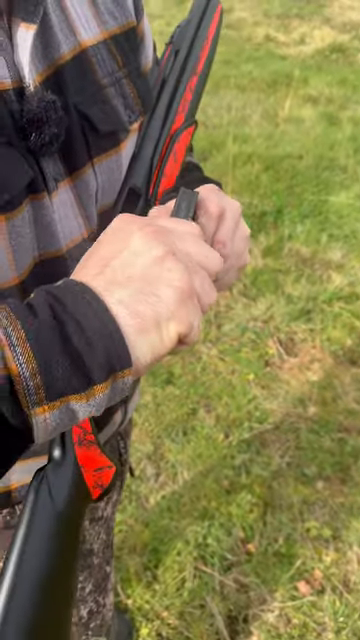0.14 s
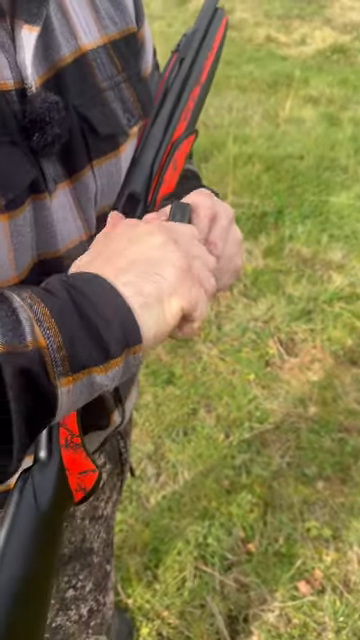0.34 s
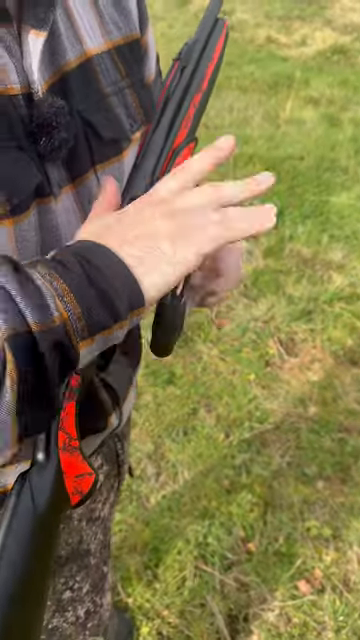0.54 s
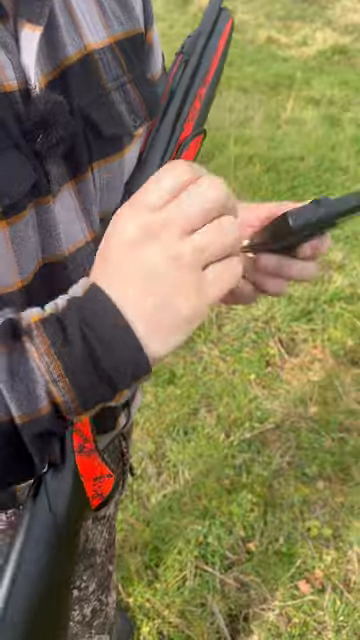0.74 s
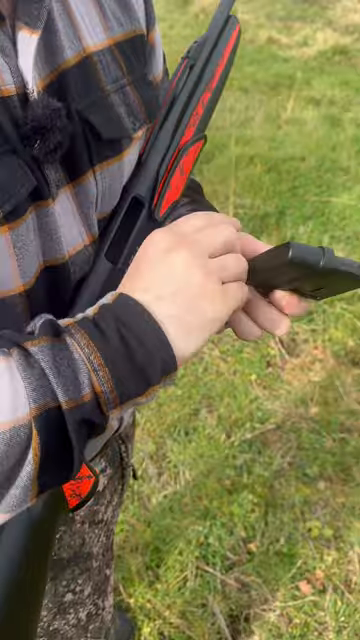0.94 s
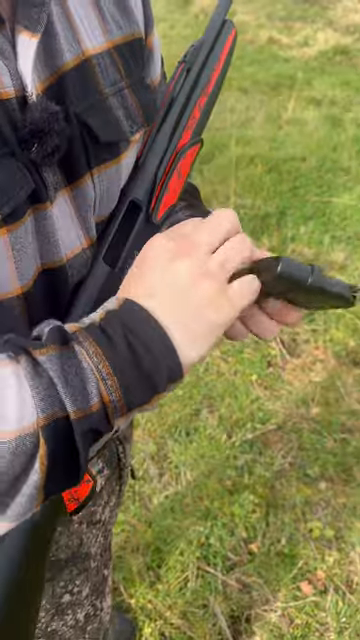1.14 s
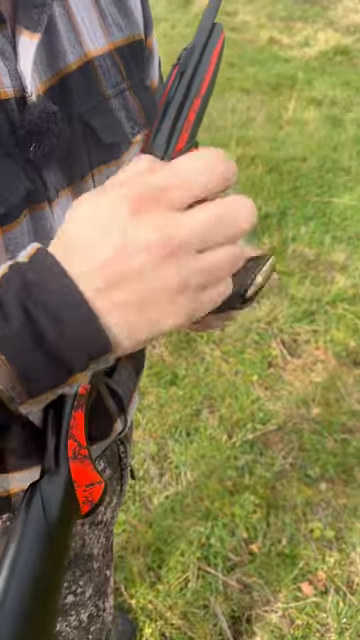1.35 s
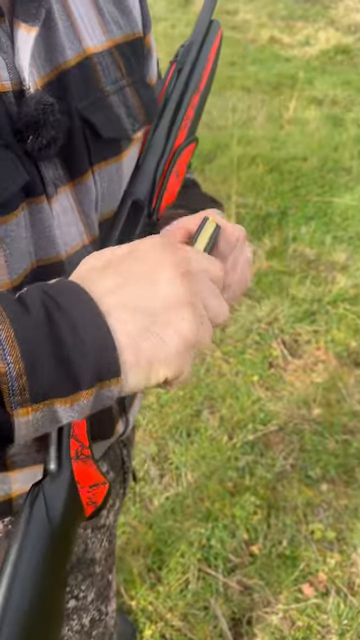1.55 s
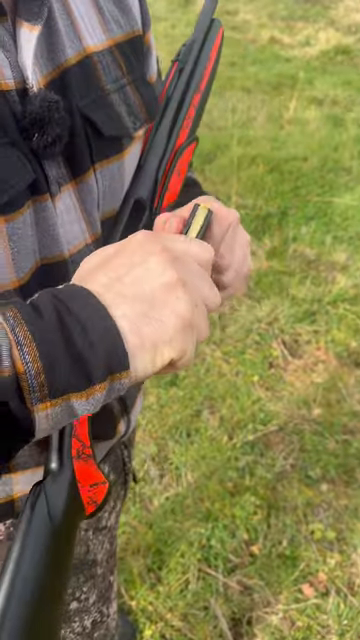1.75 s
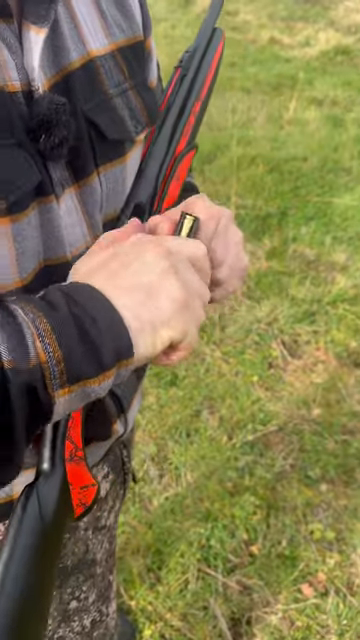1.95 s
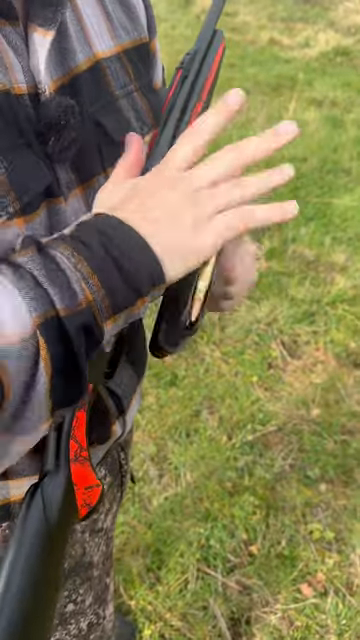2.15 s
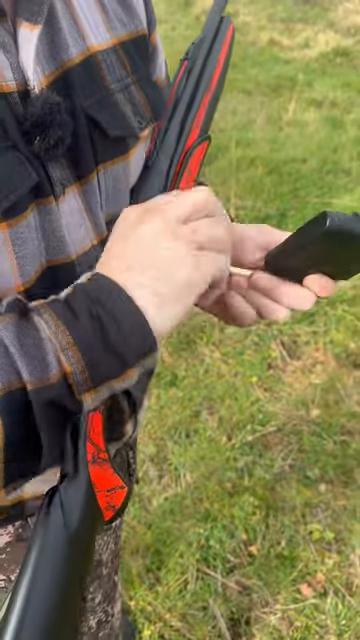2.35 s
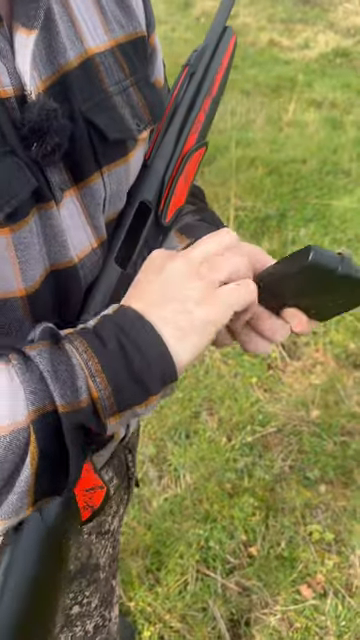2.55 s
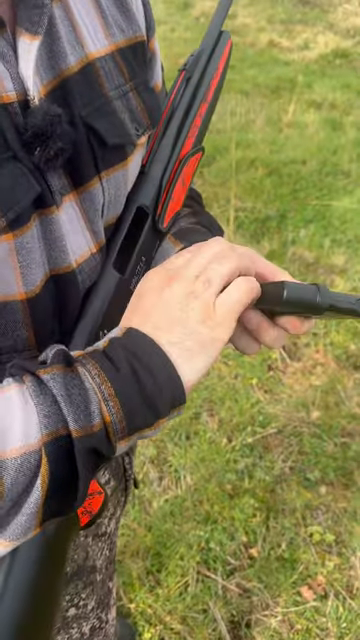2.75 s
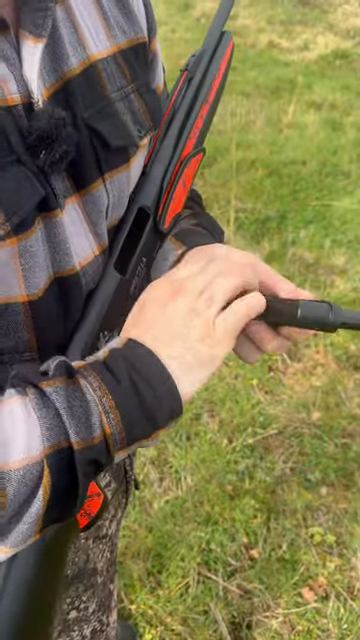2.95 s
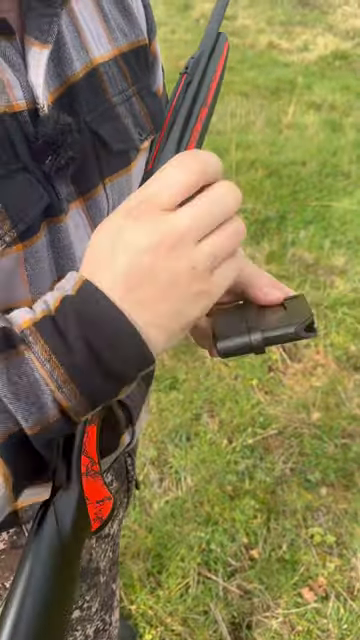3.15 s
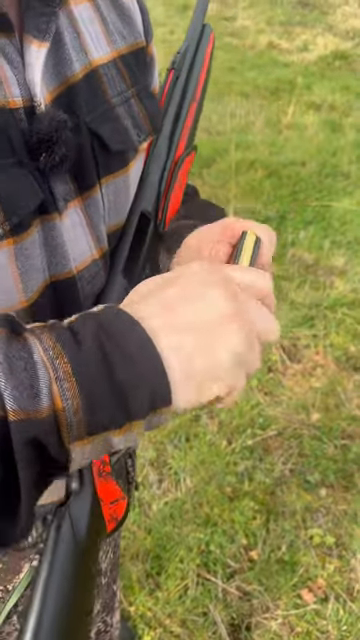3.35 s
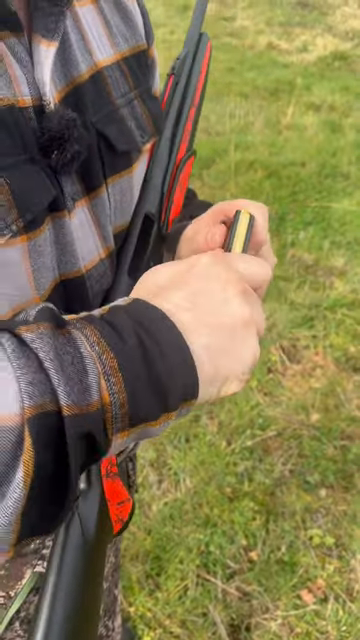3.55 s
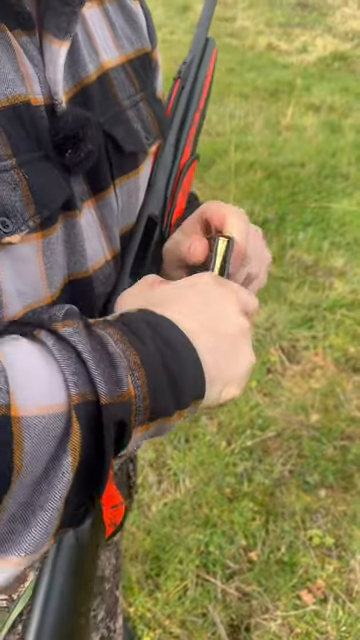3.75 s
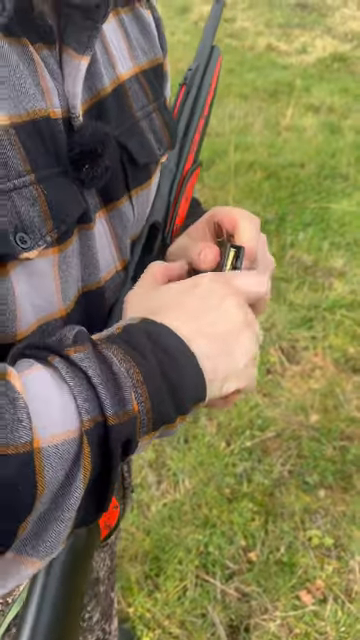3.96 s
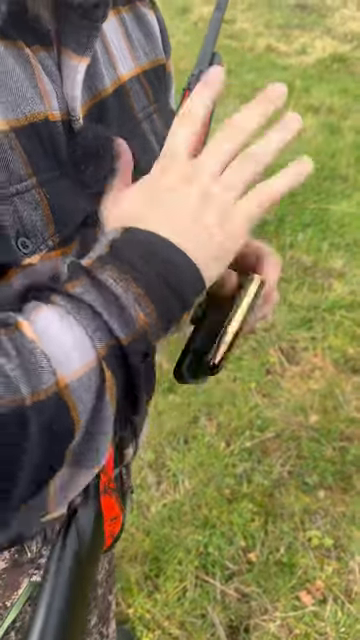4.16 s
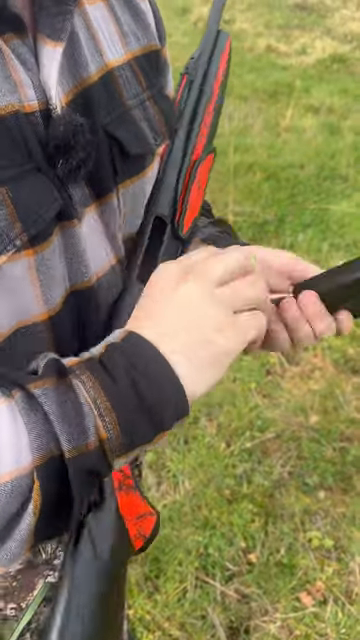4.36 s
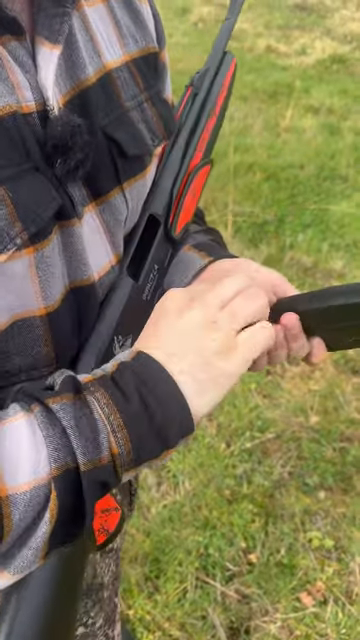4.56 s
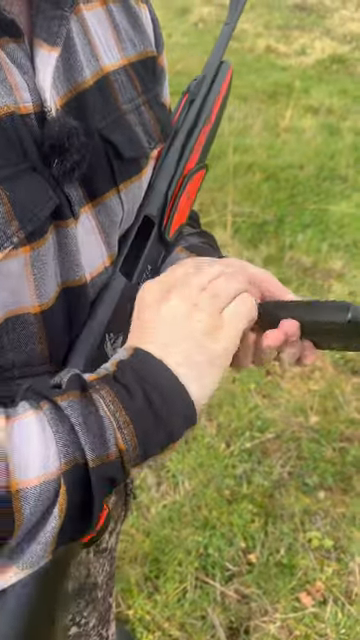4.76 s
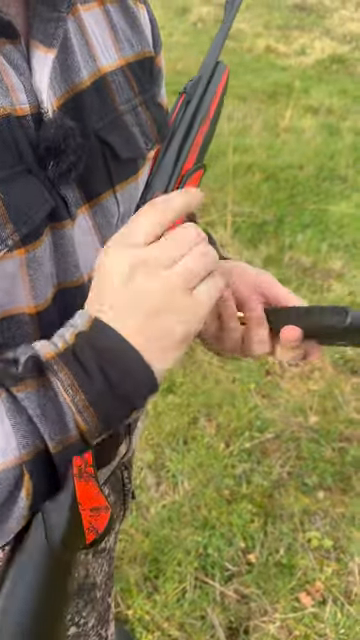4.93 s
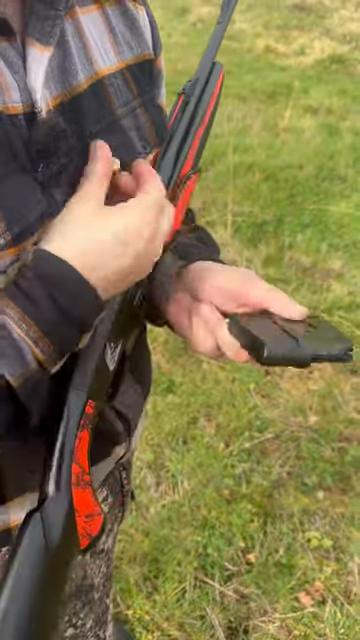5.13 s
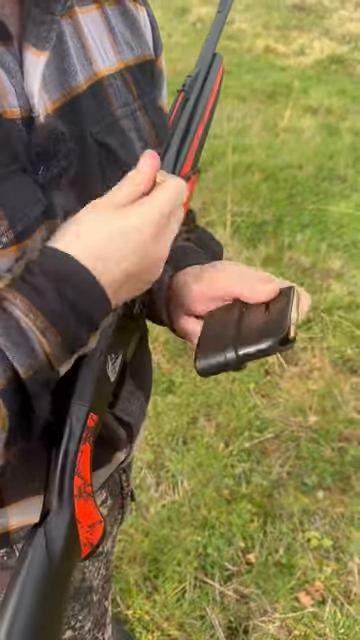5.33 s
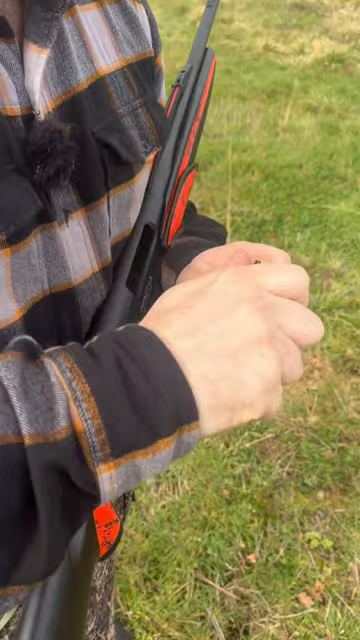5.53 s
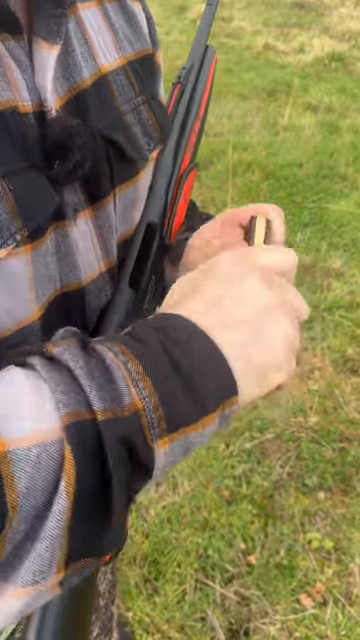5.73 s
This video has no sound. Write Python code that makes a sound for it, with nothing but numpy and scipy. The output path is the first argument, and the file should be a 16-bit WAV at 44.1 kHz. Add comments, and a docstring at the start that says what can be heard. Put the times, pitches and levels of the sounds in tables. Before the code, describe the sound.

Very close, dry handling of brass cartridges and a hollow plastic magazine. Light ticks and gritty rubs lead to sharp snaps as rounds seat, at about 0.4, 2, 3.3 and 4 seconds. A burst of wind puffs thumps the microphone after 4.3, then thin bright brass ticks near 4.9 and softer knocks to the end. Open grass field, faint hiss, no echo, small stereo microphone.

```python
"""Brass cartridges are handled and pressed into a plastic rifle magazine, close to a pair of microphone ports.
Each contact is a short chatter of micro-impacts that rings the hollow box, its walls and the brass cases.
In between, fingers and cases rub in short strokes: grit noise filtered by the same three bodies.
Wind over the ports is lumpy low noise with falling puffs; far off, a faint low tone throbs.
Behind it all lies the quiet hiss of the meadow."""
import sys
import numpy as np
from scipy import signal
from scipy.fft import rfft, irfft
from scipy.io import wavfile
from scipy.ndimage import uniform_filter1d

SR = 44100
rng = np.random.default_rng(int(sys.argv[2]) if len(sys.argv) > 2 else 0)


def log_audio(samples):
    """Write samples as a 16-bit WAV file to the path given in sys.argv[1]."""
    # one column per channel
    frames = np.atleast_2d(samples).T
    # limit to full scale, then quantise
    limited = np.clip(frames, -1, 1)
    pcm = np.round(limited * 32767).astype(np.int16)
    wavfile.write(sys.argv[1], SR, pcm)


N = 259749  # samples in the scene

# Meadow hiss, relative spectrum: f/Hz, level/dB
AIR_SPECTRUM = [(100, -9), (250, -0.5), (500, 2), (900, -6), (1500, -13), (2500, -30), (5000, -26.5),
                (8000, -30), (12500, -28.5), (14000, -31.5), (15500, -44.5)]
AIR_DB = -68.5

# Far throb, swells: centre t/s, level/dB
THROB_SWELLS = [(1.597, -60.5), (2.049, -60), (2.472, -60.5), (2.918, -60.5), (3.359, -57), (3.79, -59),
                (4.676, -61.5), (5.139, -67)]
THROB_HZ, THROB_S = 136.4, 0.14

# Wind at the ports over time: t/s, rumble level/dB, roar level/dB
WIND_LEVELS = [(0.0, -42, -70), (0.38, -56.5, -67.5), (1.21, -52.5, -69), (1.43, -48, -62.5),
               (1.47, -57, -68.5), (1.76, -49.5, -68), (2.43, -59.5, -65), (2.46, -45, -67),
               (2.54, -61, -67.5), (2.95, -53, -65), (3.33, -56, -66.5), (3.61, -47.5, -71),
               (4.1, -54.5, -60.5), (4.36, -43, -62), (4.56, -49, -71), (4.59, -64.5, -61),
               (4.67, -49, -69), (4.71, -57, -66), (4.89, -60.5, -71), (4.92, -42.5, -60),
               (5.02, -67.5, -71), (5.3, -59.5, -70), (5.41, -71, -71.5), (5.68, -52.5, -64.5),
               (5.76, -42, -63), (5.89, -62, -69)]
# Low rumble of the wind, relative spectrum: f/Hz, level/dB
RUMBLE_SPECTRUM = [(20, -34.5), (35, -17), (50, -2), (64, 9), (80, -7), (110, -4), (160, -24.5),
                   (250, -63.5)]
# Higher roar of the wind, relative spectrum: f/Hz, level/dB
ROAR_SPECTRUM = [(60, -31), (110, -2), (150, 6), (220, -2), (320, -8), (500, -35)]
# Puffs on the ports: start t/s, peak level/dB, start f/Hz, end f/Hz, length/s
WIND_PUFFS = [(4.272, -39.5, 157, 98.4, 0.079), (4.311, -32.5, 380, 68.6, 0.021),
              (4.364, -32, 352, 57.8, 0.027), (4.423, -42, 301, 93, 0.013),
              (4.441, -35.5, 129.5, 50.6, 0.028), (4.469, -41.5, 172, 140.3, 0.052),
              (4.495, -36, 277.5, 70.6, 0.017), (4.528, -38, 132.7, 49, 0.02),
              (4.656, -46.5, 118.4, 45.5, 0.032), (4.914, -41.5, 239, 60, 0.0306),
              (5.615, -45.5, 185, 107, 0.021), (5.685, -41, 149, 90, 0.022), (5.714, -43, 216, 137, 0.036),
              (5.738, -33.5, 203, 45, 0.0094)]
GUST_DB, GUST_S = 1.5, .05  # depth of the slow rumble gusts, and their averaging span

# Hands shifting their grip: t/s, plastic level/dB, brass level/dB
GRIP_LEVELS = [(0.0, -84, -81), (0.39, -70.5, -74.5), (0.59, -84.5, -82.5), (1.06, -74, -76.5),
               (1.52, -89, -82.5), (1.92, -73.5, -79.5), (2.18, -78, -75.5), (2.38, -91, -89),
               (2.62, -86, -93.5), (3.07, -89.5, -82), (3.66, -80, -78.5), (4.13, -81, -74),
               (4.33, -85, -75), (4.56, -91, -83.5), (5.05, -75, -70), (5.61, -87.5, -80), (5.79, -79, -83),
               (5.89, -60.5, -72)]
GRIP_HOLLOW_DB = -1  # the hollow against the walls
# Strokes of fingers and cases: start t/s, length/s, hollow, walls and brass level/dB, swell to the end/dB
RUB_STROKES = [(0.069, 0.057, -81, -66.5, -78, 13.5), (0.124, 0.014, -53.5, -64, -52, -21),
               (.18, 0.049, -58.5, -62.5, -60.5, 1.5), (0.24, 0.071, -72, -77, -76, -2),
               (0.363, .06, -60, -58, -67, 15), (0.429, 0.029, -44, -40, -45, -16),
               (0.458, 0.027, -59, -46, -44.5, -8), (0.502, 0.12, -64.5, -68.5, -71, -5),
               (0.741, 0.041, -77.5, -78, -77, 9.5), (0.8, 0.11, -58.5, -60, -68.5, -12.5),
               (1.032, 0.017, -58.5, -63, -74.5, -23), (1.133, 0.059, -65.5, -59.5, -47, -6),
               (1.568, 0.042, -66.5, -74, -78, -5.5), (1.637, 0.1, -70, -72.5, -83.5, -7),
               (1.745, 0.29, -60.5, -71, -66.5, -14.5), (1.972, 0.059, -56, -56, -58.5, 9),
               (2.011, 0.059, -40.5, -41, -49.5, -23), (2.107, 0.055, -65, -65, -65.5, -5),
               (2.266, 0.13, -66, -68.5, -69.5, -7), (2.605, 0.052, -58.5, -63.5, -67.5, -11.5),
               (2.807, 0.092, -70, -73, -70, -15), (2.993, 0.053, -67, -70, -72, -7.5),
               (3.117, 0.028, -65.5, -69.5, -71.5, 4.5), (3.154, .1, -77.5, -78.5, -74, -10.5),
               (3.333, 0.049, -69, -45, -55, -12.5), (3.553, 0.075, -63, -65, -67.5, -1),
               (3.705, 0.076, -53, -60, -59.5, -4.5), (3.838, 0.025, -61, -78.5, -69.5, 1),
               (3.94, 0.055, -71, -72, -67.5, 18), (3.989, 0.033, -44, -42, -44.5, -4),
               (4.066, 0.064, -68, -73, -68.5, -6), (4.091, 0.076, -59.5, -75, -61.5, -15),
               (4.235, 0.064, -70.5, -72, -74, -5), (4.528, 0.12, -68, -65, -65.5, -10),
               (4.818, 0.026, -77.5, -84.5, -68, -11.5), (4.853, 0.038, -73, -83, -61.5, -9),
               (4.906, 0.094, -90, -90, -68.5, -8.5), (5.2, 0.072, -70, -67, -69, -10),
               (5.592, 0.02, -67.5, -58, -64, -10.5), (5.654, 0.11, -62.5, -69, -67, -20),
               (5.847, .06, -77, -64, -57.5, 1.5)]
STROKE_RISE_S, STROKE_FADE_S = 0.0023, 0.005
# Hollow box under rubbing, relative spectrum: f/Hz, level/dB
RUB_HOLLOW_SPECTRUM = [(300, -27), (700, -12.5), (1000, -5.5), (1200, -0.5), (1400, -11.5), (2000, -21),
                       (4000, -49)]
# Box walls under rubbing, relative spectrum: f/Hz, level/dB
RUB_WALLS_SPECTRUM = [(1000, -32), (1700, -5), (2400, 0.5), (3000, -7), (3600, 1.5), (4300, -19.5),
                      (8000, -45)]
# Brass cases under rubbing, relative spectrum: f/Hz, level/dB
RUB_BRASS_SPECTRUM = [(2500, -26.5), (4000, -5), (4700, 3.5), (5600, -5.5), (8000, -6.5), (9800, -10),
                      (11000, -10.5), (15000, -14.5)]

# Contacts of cases, fingers and magazine: t/s, hollow level/dB, hollow f/Hz, brass f/Hz,
# walls level/dB, brass level/dB, crack level/dB, hold/ms, chatter decay/ms
CONTACT_EVENTS = [(0.0751, -34, 1250, 4200, -34.0, -46, -38.5, 1.1, 1.4),
                  (0.11, -35, 1250, 4400, -42.5, -56, -53, 0.45, 1.7),
                  (0.1174, -31, 1130, 4480, -31, -32.5, -29, 1.5, 0.64),
                  (0.1802, -52, 1275, 5030, -59, -58, -57, 1.8, 3.5),
                  (0.2053, -44, 1250, 5260, -58, -65, -67, 1.3, 4.5),
                  (0.2154, -47, 1220, 4750, -67, -63, -69, 4.9, 1.1),
                  (0.2328, -51, 1310, 4550, -60, -68, -67, 1.3, 1.1),
                  (0.2835, -56.6, 1190, 4300, -63.6, -76, -72, 2.3, 4),
                  (0.3018, -50.5, 1200, 4530, -70, -78, -72, 0.6, 4.1),
                  (0.3096, -49, 1180, 4640, -65, -67.0, -70.4, 1.9, 1.9),
                  (0.4019, -55, 1080, 4930, -39.5, -48.6, -66, 1.4, 2.4),
                  (0.4215, -19, 1214, 4700, -21, -24.5, -15, 0.27, 1.16),
                  (0.426, -25, 1210, 5330, -28.5, -44, -24, 1.03, 1.3),
                  (0.4348, -41, 1235, 5080, -31.5, -42, -39.7, 0.3, 2.1),
                  (0.4644, -37.5, 1180, 4350, -37.5, -49, -45.8, 0.6, 2),
                  (0.4702, -30.5, 1090, 4680, -27.5, -33.5, -37, 0.42, 0.79),
                  (0.475, -48.5, 1150, 4430, -36.5, -53, -55, 1.5, 2),
                  (0.5494, -56.5, 1190, 4900, -53, -50.5, -49.5, 0.3, 1.4),
                  (0.7898, -42, 1065, 4580, -69, -33, -48.5, 4.3, 1.7),
                  (0.7983, -47, 1230, 4410, -40, -29, -61, 1.2, 0.92),
                  (0.8058, -44, 1330, 4640, -41.5, -42, -50, 0.3, 3.1),
                  (0.831, -37.5, 1255, 5250, -39.5, -53, -46.5, 5.7, 1.4),
                  (0.87, -45, 1164, 4600, -49, -60.5, -52.5, 6.1, 1.85),
                  (0.9145, -58, 1246, 4900, -57, -68, -64, 1.2, 2),
                  (1.0113, -55.5, 1260, 4810, -58.5, -65, -81.5, 0.3, 3.1),
                  (1.0248, -44.5, 1303, 4560, -43, -47.5, -54, 1.9, 1.7),
                  (1.0771, -57.5, 1190, 4600, -71, -61.1, -73, 2.9, 1.2),
                  (1.1331, -49.5, 1230, 4640, -56, -49.5, -59, 1.2, 7),
                  (1.1463, -57, 1214, 4660, -64, -34.5, -40.6, 0.3, 3),
                  (1.1569, -49.5, 1240, 4400, -63, -25.5, -39, 1.3, 0.79),
                  (1.1851, -74, 1220, 4950, -68, -48, -57, 1.3, 3.5),
                  (1.1931, -70, 880, 4250, -49, -43, -53, 1.05, 1.3),
                  (1.2684, -63, 1300, 4450, -78, -77.5, -70.5, 1.4, 2.1),
                  (1.3002, -52, 1270, 4960, -55.5, -69, -58.5, 0.87, 0.77),
                  (1.3151, -52, 1113, 4850, -71, -76, -70.5, 1.3, 2),
                  (1.3686, -60, 1236, 4710, -78, -80.5, -72.5, 2.1, 3.3),
                  (1.4783, -58.5, 1240, 4370, -64.5, -76.5, -73.5, 0.5, 1.5),
                  (1.5598, -38.5, 1240, 4640, -41, -42, -42.5, 0.7, 1.54),
                  (1.7008, -64.5, 1170, 4610, -69, -68, -58.0, 0.6, 0.8),
                  (1.7411, -45, 1180, 5160, -53, -83, -72, 2.4, 2.2),
                  (1.7534, -43.5, 1170, 4730, -43, -50, -48.5, 0.42, 0.87),
                  (1.785, -60, 1170, 5120, -51, -61.0, -69, 1.2, 3.5),
                  (1.8076, -46.5, 1100, 4750, -55, -70, -55, 1.2, 3),
                  (1.996, -34.5, 930, 4750, -37, -55, -43, 0.26, 1.4),
                  (2.0103, -19, 750, 4570, -22.5, -28, -25, 3.2, 2.3),
                  (2.0507, -43, 880, 4400, -36, -46.5, -58, 0.22, 1.0),
                  (2.1222, -52, 940, 4540, -49.5, -62, -52, 0.92, 3.1),
                  (2.13, -41, 872, 4690, -49, -40, -42.0, 0.35, 0.85),
                  (2.1746, -58.5, 895, 4400, -67.5, -77, -75, 0.3, 3.8),
                  (2.2724, -54.5, 1360, 4600, -50.5, -51, -66, 8.7, 2.1),
                  (2.3032, -55.7, 1353, 4750, -52.5, -52.5, -68.5, 1.2, 1.6),
                  (2.3495, -56.5, 1096, 4600, -63, -81, -76.5, 0.3, 2.8),
                  (2.3643, -51.5, 1080, 4600, -49, -58.5, -55, 3.2, 1.8),
                  (2.6103, -46.5, 1060, 4580, -39.5, -43.5, -55, 0.29, 1.3),
                  (2.7426, -59.5, 1185, 4400, -52.5, -58.5, -54, 0.5, 4.2),
                  (2.7698, -67, 834, 4580, -60, -58.5, -68.5, 0.72, 0.64),
                  (2.8043, -48, 1260, 4530, -48, -37, -55, 0.49, 3.1),
                  (2.86, -58, 1124, 4560, -82, -74.5, -74, 5, 3.4),
                  (2.9141, -60.5, 720, 4550, -73, -68.5, -64.5, 1.8, 1.9),
                  (2.9978, -66, 1038, 4830, -61.5, -51, -58, 0.81, 2.5),
                  (3.0288, -66.5, 758, 4700, -69.5, -74.5, -71.5, 3.8, 1.55),
                  (3.3302, -32, 1342, 4130, -31.5, -27, -22.5, 1.43, 0.75),
                  (3.3637, -43, 1260, 4400, -34.5, -39, -43, 1.84, 0.45),
                  (3.427, -67, 1054, 5290, -58, -74, -73, 1.3, 1.6),
                  (3.4616, -53.4, 1260, 5180, -45, -45.5, -51, 0.48, 0.98),
                  (3.4792, -72, 960, 4800, -57, -67.5, -72, 0.3, 1.5),
                  (3.5543, -59, 1214, 4260, -70, -74, -74, 0.7, 2.2),
                  (3.5799, -37, 903, 4600, -44.5, -55, -56, 0.75, 1.4),
                  (3.6093, -43.5, 930, 4720, -39.4, -60, -41.5, 0.25, 0.71),
                  (3.6931, -48.5, 1060, 4500, -51, -59, -48, 0.3, 1.4),
                  (3.7319, -41.5, 810, 5100, -40.5, -50, -36.5, 0.8, 2.2),
                  (3.7393, -38, 960, 5200, -43.5, -61, -49.7, 1.2, 1.1),
                  (3.7664, -44, 1060, 4940, -44, -46.8, -39.5, 2.1, 2.4),
                  (3.9177, -43.5, 920, 5300, -64.5, -59, -62.9, 0.36, 0.46),
                  (3.9331, -51, 960, 4340, -47.5, -53, -52, 1.2, 0.58),
                  (3.9514, -45.5, 930, 5080, -53.5, -65, -55.1, 0.23, 1.1),
                  (3.9663, -48, 950, 4620, -43.5, -44, -43, 0.3, 1.1),
                  (3.9813, -40, 890, 4400, -27, -29, -36, 0.3, 3.5),
                  (3.9891, -18, 1106, 4300, -20, -18, -15.5, 0.5, 3),
                  (4.0107, -30, 890, 4760, -29.5, -28.5, -31, 1.8, 0.63),
                  (4.022, -54, 980, 5300, -48.5, -56, -41, 2.9, 0.5),
                  (4.1021, -26, 1046, 5470, -31.5, -33.5, -31, 0.2, 0.95),
                  (4.142, -50.5, 913, 4470, -46, -56, -62, 0.3, 1.4),
                  (4.2331, -48.0, 1040, 4550, -34.5, -30.5, -53, 0.76, 1.7),
                  (4.3389, -57, 1157, 4740, -56, -54, -66, 1.2, 1.4),
                  (4.3955, -70, 716, 4600, -82, -46, -60, 2.0, 0.9),
                  (4.5361, -46.5, 1070, 5050, -43.5, -34.5, -38.2, 0.61, 1.15),
                  (4.5577, -51.5, 1040, 4500, -65.5, -49.5, -69.5, 0.94, 2.2),
                  (4.5646, -67, 1058, 4610, -61.5, -50.5, -66.5, 0.27, 2),
                  (4.6812, -70, 765, 4400, -62.5, -51.5, -60.5, 3.2, 1.1),
                  (4.8007, -70.5, 770, 4510, -67, -48.5, -54, 1.07, 3.3),
                  (4.806, -66, 870, 4480, -67, -52, -52.5, 3, 2.5),
                  (4.8536, -56.5, 1060, 4370, -62, -33.5, -49.1, 1.4, 3.2),
                  (4.8646, -67.5, 880, 4960, -67, -23, -24.5, 0.44, 0.37),
                  (4.88, -60, 1150, 4570, -73, -40.5, -42, 0.3, 0.4),
                  (4.885, -64, 1170, 4660, -60, -39, -35, 0.3, 5.1),
                  (4.9015, -62, 1015, 4700, -78, -23.5, -32, 0.25, 1.1),
                  (5.2067, -50.1, 1050, 4550, -38.5, -47, -53.6, 0.27, 0.69),
                  (5.2149, -53.5, 1060, 4530, -46.5, -56, -63.5, 4.5, 2.4),
                  (5.3712, -54.5, 1100, 4550, -63.5, -80.5, -69.5, 1.06, 4.1),
                  (5.5815, -37.5, 1060, 4700, -37.5, -45.5, -41, 1.56, 3.8),
                  (5.65, -53, 1060, 4770, -59.0, -58.5, -69.5, 1.1, 0.71),
                  (5.6984, -36, 1027, 4770, -40, -50, -43, 1.6, 1.5),
                  (5.7496, -44.5, 900, 4110, -49, -54, -51.9, 1.7, 0.68),
                  (5.7963, -55.6, 1280, 4450, -55, -51, -68, 0.3, 0.99),
                  (5.8767, -46.5, 1025, 4900, -58, -67, -46, 0.38, 2.6)]
# Modes of the hollow: factor on the contact's hollow f, relative level/dB, t60/s
HOLLOW_MODES = [(1.0, 2, 0.014), (1.7, -9, .012), (0.99, -11, .014)]
# Box modes that ring with the hollow: f/Hz, relative level/dB, t60/s
BOX_MODES = [(1330, -4.5, 0.012), (1530, -10, .01)]
# Thud of the whole magazine in the hand: f/Hz, relative level/dB, t60/s
THUD_MODES = [(300, -15.5, 0.0076), (448, -8, 0.013), (634, -18, 0.019)]
# The thud grows as the magazine fills: t/s, added level/dB
THUD_WEIGHT = [(.5, -13.5), (2.0, 5)]
# Modes of one wall: f/Hz, relative level/dB, t60/s
WALL_MODES = [(1760, -5, 0.012), (2166, -3.5, 0.0097), (2417, 3.5, 0.0069), (2900, -7, .008),
              (3220, -6, 0.004), (3500, -4, 0.008), (3986, -3, 0.008)]
# Modes of the brass cases: factor on the contact's brass f, relative level/dB, t60/s
BRASS_MODES = [(1.0, 3, 0.014), (.94, -8.5, .01), (1.075, -1, 0.0078), (1.16, -5, 0.0072),
               (2.04, -11.5, .012), (2.13, -7, 0.0073)]
# Modes of the bright crack: f/Hz, relative level/dB, t60/s
CRACK_MODES = [(5310, 2, 0.0064), (6650, 9, 0.004), (7820, -5, 0.0031), (7230, -5.5, 0.0011),
               (9160, -7.5, 0.0044), (9660, 6, 0.0023), (10100, -1.5, 0.00077), (10940, -6, 0.011),
               (12940, -12, 0.0017), (13600, -2, 0.012), (15600, -7, 0.0029)]
RISE_MS, RISE_SHARE = .45, .2  # base rise, and rise in ms added per ms of chatter
RATTLE_DB, RATTLE_MS = -21.5, 7.1  # faint slower tail against the blow
# The thud fades by THUD_GROWTH dB for each dB that the hollow stays under a heavy blow
HEAVY_DB, THUD_GROWTH = -17, 0.52

# Phase by which the left port leads: f/Hz, lead/rad
PORT_LEAD = [(0, 0), (150, -.45), (500, -.6), (1460, -.4), (2070, .5), (2400, 2.6), (3500, 2.0),
             (5000, 2.1), (6000, 3.2), (7700, 6.2), (10200, 9.4), (13800, 14.6), (16000, 16.3)]
# Likeness of the two ports, 0 to 1: f/Hz, near sources, meadow air
PORT_LIKENESS = [(60, .98, .9), (130, .93, .75), (300, .9, .45), (600, .93, .45), (1200, .95, .5),
                 (2500, .95, .85), (3200, .75, .55), (5000, .75, .6), (6000, .95, .9), (16000, .97, .9)]
# Left port level minus right: f/Hz, level/dB
PORT_BALANCE = [(60, -.4), (650, -4), (1100, -1.5), (1700, 0), (2200, -4.5), (3000, -1), (6000, 0),
                (16000, 0)]
EDGE_HZ = 16400  # upper edge of the microphone band


def gain_of(db):
    """Decibels to gain."""
    return 10 ** (np.asarray(db) / 20)


def evened(x):
    """Scales to rms 1."""
    return x / np.sqrt(np.mean(x ** 2) + 1e-20)


def read(points, hz, column=1):
    """Reads a spectrum table on a log-frequency axis."""
    points = np.array(points, float)
    return np.interp(np.log(hz + 1), np.log(points[:, 0] + 1), points[:, column])


def curve(rows, column):
    """One column of a time table at every sample."""
    rows = np.array(rows, float)
    return np.interp(np.arange(N) / SR, rows[:, 0], rows[:, column])


def colour(x, spectrum):
    """Filters by a spectrum, then scales to rms 1."""
    gains = gain_of(read(spectrum, np.fft.rfftfreq(N, 1 / SR)))
    return evened(irfft(rfft(x) * gains, N))


def lumps(size):
    """Slow random curve of rms 1: noise averaged twice over `size` samples."""
    once = uniform_filter1d(rng.standard_normal(N), size)
    return evened(uniform_filter1d(once, size))


def add(mix, s, sound):
    """Mixes a sound in at time s in seconds."""
    part = mix[..., round(s * SR):][..., :sound.shape[-1]]
    part += sound[..., :part.shape[-1]]


def air():
    """The quiet hiss of the meadow: coloured noise, slowly swelling."""
    swell = gain_of(AIR_DB + 0.85 * lumps(size=4000))
    return swell * colour(rng.standard_normal((2, N)), AIR_SPECTRUM)


def throb():
    """A soft far low tone with a weak octave that swells and fades a little over twice a second."""
    out, t = np.zeros(N), np.arange(0, THROB_S, 1 / SR)
    swell = 2 * np.hanning(len(t))  # mean of 1
    for s, db in THROB_SWELLS:
        phase = 2 * np.pi * (THROB_HZ * t + rng.random())
        tone = np.sin(phase) + gain_of(-24) * np.sin(2 * phase)
        add(out, s - THROB_S / 2, gain_of(db) * swell * tone)
    return out


def puff(db, start_hz, end_hz, length):
    """One eddy passes the ports: a swelling tone of falling pitch, with its own phase in each draw."""
    u = np.arange(0, 1, 1 / (length * SR))
    turns = np.cumsum(start_hz * (end_hz / start_hz) ** u) / SR
    swell = np.sin(np.pi * u ** 0.57) ** 2  # peaks before the middle
    return gain_of(db) * swell * np.sin(2 * np.pi * (turns + rng.random((2, 1))))


def wind():
    """Air tumbling over the ports: lumpy rumble and roar, plus puffs."""
    gusts = GUST_DB * lumps(size=round(GUST_S * SR)) + 1.0 * lumps(size=900)
    rumble = colour(rng.standard_normal((2, N)), RUMBLE_SPECTRUM)
    out = gain_of(curve(WIND_LEVELS, 1) + gusts) * rumble
    roar = colour(rng.standard_normal((2, N)), ROAR_SPECTRUM)
    out += gain_of(curve(WIND_LEVELS, 2) + 1.3 * lumps(size=500)) * roar
    for s, *shape in WIND_PUFFS:
        add(out, s, puff(*shape))
    return out


def pressure():
    """How hard the hollow, the walls and the brass are rubbed: the shifting grip plus every stroke."""
    plastic_db, brass_db = curve(GRIP_LEVELS, 1), curve(GRIP_LEVELS, 2)
    t = np.arange(N) / SR
    out = gain_of([plastic_db + GRIP_HOLLOW_DB, plastic_db, brass_db])
    for start, length, *body_dbs, swell_db in RUB_STROKES:
        rise = np.minimum(t - start, 0) / STROKE_RISE_S
        fade = np.maximum(t - start - length, 0) / STROKE_FADE_S
        swell = gain_of(swell_db * np.clip((t - start) / length, 0, 1))
        out = out + gain_of(body_dbs)[:, None] * np.exp(rise - fade) * swell
    return out


def rub():
    """Grit of tiny slips, clumped into millisecond catches, excites the hollow, the walls and the brass."""
    steps = np.repeat(rng.exponential(1, N // 60 + 1), repeats=60)[:N]
    catches = np.minimum(uniform_filter1d(steps, size=30), 4)
    slips = gain_of(2 * rng.exponential(1, N) + 2.1 * catches + 2.4 * lumps(size=300))
    out = np.zeros((2, N))
    spectra = (RUB_HOLLOW_SPECTRUM, RUB_WALLS_SPECTRUM, RUB_BRASS_SPECTRUM)
    for push, spectrum in zip(pressure(), spectra):
        out += push * colour(slips * rng.standard_normal((2, N)), spectrum)
    return out


def ring(modes, drive, spread):
    """Micro-impacts ring a set of modes; the grip detunes and weights them at every contact."""
    t = np.arange(1100) / SR
    hz, db, t60 = np.transpose(modes)[..., None]
    weighting, detuning = rng.standard_normal((2, len(modes), 1))
    hz = hz * (1 + spread * detuning)
    soft = 1 - np.exp(-t * hz / 0.57)  # a contact lasts about one cycle, so each mode starts softly
    decay = gain_of(db + 0.2 * weighting - 60 * t / t60)
    responses = soft * decay * np.sin(2 * np.pi * hz * t)
    signs = rng.choice([-1., 1.], (2, len(modes)))  # each draw has its own mode signs
    sound = signal.fftconvolve(drive[None], signs @ responses, axes=1)
    loudest = uniform_filter1d((sound ** 2).mean(0), size=80).max()
    return sound / np.sqrt(loudest)


def impacts(ms, hold, chatter):
    """Four bursts of random micro-impacts that swell to a blow, hold, chatter away and faintly rattle."""
    after = np.maximum(ms - hold, 0)
    rise = np.exp(np.minimum(ms, 0) / (RISE_MS + RISE_SHARE * chatter))
    fade = np.exp(-after / chatter) + gain_of(RATTLE_DB) * np.exp(-after / RATTLE_MS)
    grains = rng.exponential(1, len(ms)) ** 0.22  # shared by all four bodies
    return rise * fade * rng.standard_normal((4, len(ms))) * grains


def contacts():
    """Cases and magazine meet: each chatter of impacts rings the hollow, walls, brass and crack modes."""
    out, ms = np.zeros((2, N)), np.arange(-400, 1600) / SR * 1000
    for s, hollow_db, hollow_hz, brass_hz, walls_db, brass_db, crack_db, hold, chatter in CONTACT_EVENTS:
        thud_db = np.interp(s, *np.transpose(THUD_WEIGHT)) + THUD_GROWTH * (hollow_db - HEAVY_DB)
        thud = np.add(THUD_MODES, (0, thud_db, 0))
        hollow = np.vstack([np.multiply(HOLLOW_MODES, (hollow_hz, 1, 1)), BOX_MODES, thud])
        walls = np.tile(WALL_MODES, (4, 1))  # four walls, each detuned its own way
        brass = np.multiply(BRASS_MODES, (brass_hz, 1, 1))
        crack = np.tile(CRACK_MODES, (2, 1))  # two sets, each detuned its own way
        bodies = (hollow, walls, brass, crack)
        levels = (hollow_db, walls_db, brass_db, crack_db)
        spreads = (0.051, .06, 0.012, 0.055)  # detuning as a share of the pitch
        for modes, drive, spread, db in zip(bodies, impacts(ms, hold, chatter), spreads, levels):
            add(out, s + ms[0] / 1000, gain_of(db) * ring(modes, drive, spread))
    return out


def ports(pair, likeness_column):
    """Two draws become left and right: left mixes in the second draw and leads by the port phase."""
    hz = np.fft.rfftfreq(N, 1 / SR)
    same = np.clip(read(PORT_LIKENESS, hz, likeness_column), 0, 1)
    first, second = rfft(pair)
    lead = np.exp(1j * np.interp(hz, *np.transpose(PORT_LEAD)))
    left = (same * first + np.sqrt(1 - same ** 2) * second) * lead
    half = gain_of(read(PORT_BALANCE, hz) / 2)
    return irfft(np.array([left * half, first / half]), N)


def scene():
    """Meadow air reaches the two ports with one likeness; throb, wind, rubbing and contacts with another."""
    return ports(air(), likeness_column=2) + ports(throb() + wind() + rub() + contacts(), likeness_column=1)


def record(dry):
    """The microphone band limit: a steep low-pass."""
    low_pass = signal.firwin(511, EDGE_HZ, window=("kaiser", 9), fs=SR)
    return signal.oaconvolve(dry, low_pass[None], "same", axes=1)


dry = scene()
out = record(dry)
log_audio(out)
```